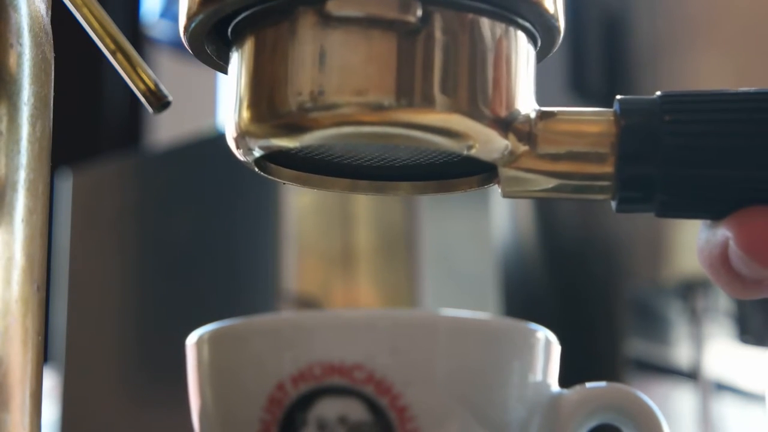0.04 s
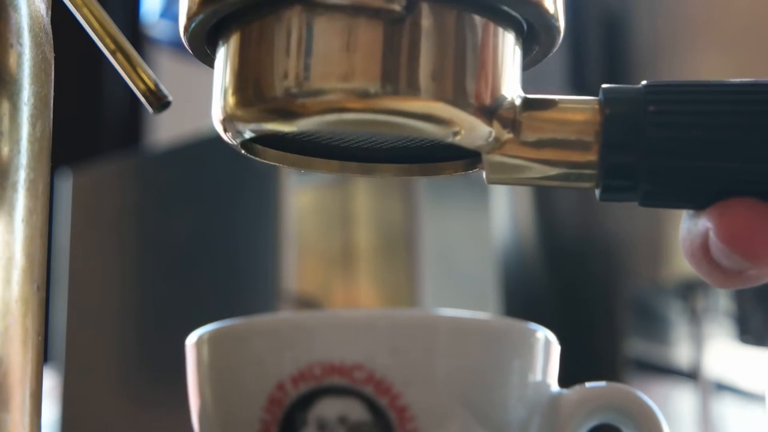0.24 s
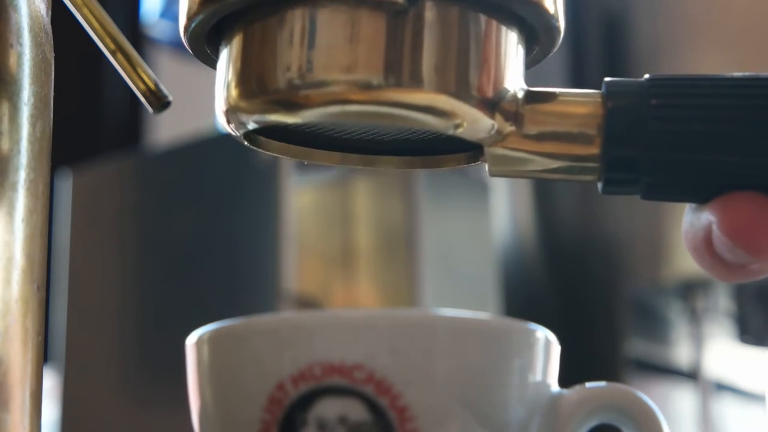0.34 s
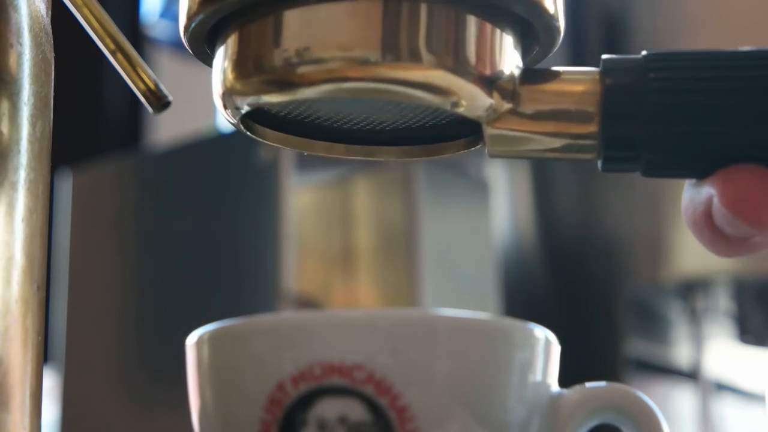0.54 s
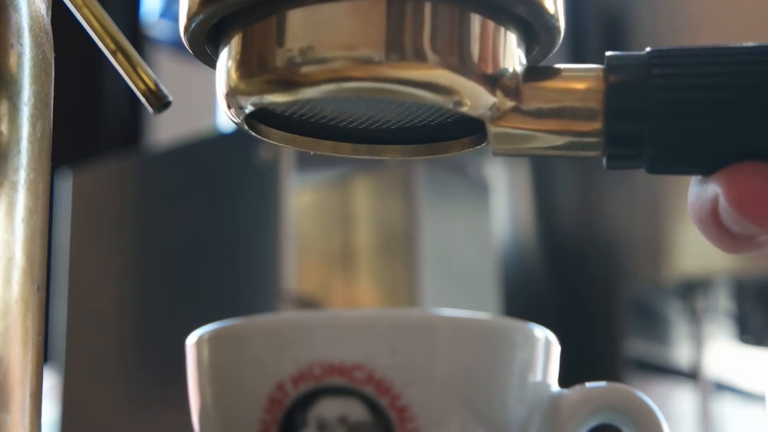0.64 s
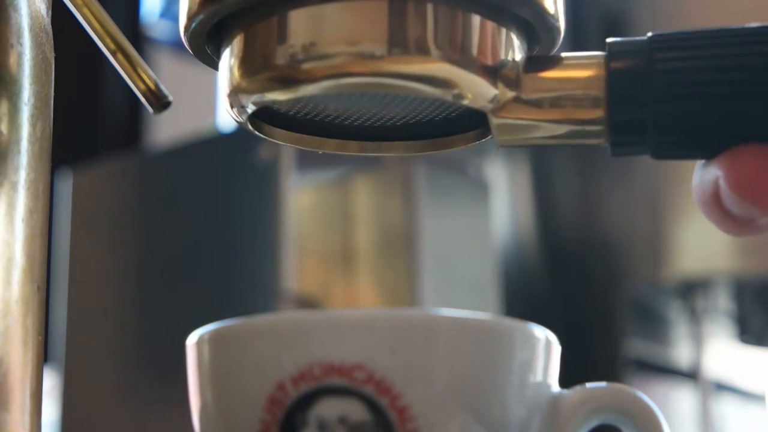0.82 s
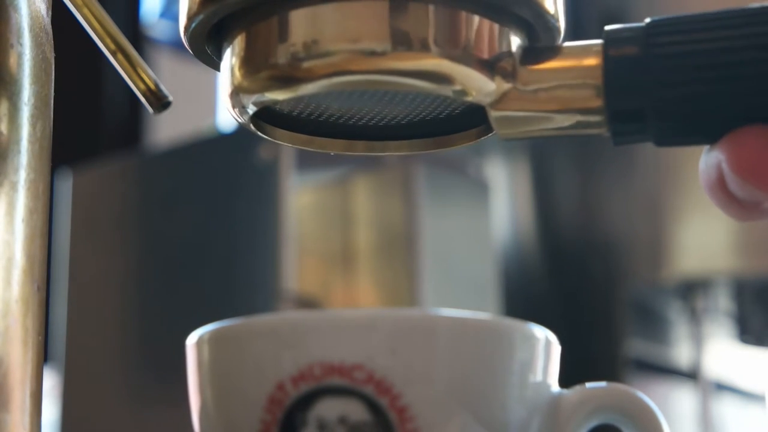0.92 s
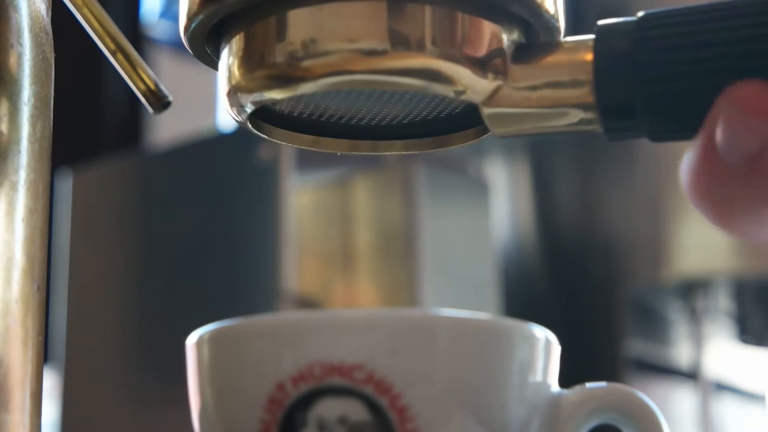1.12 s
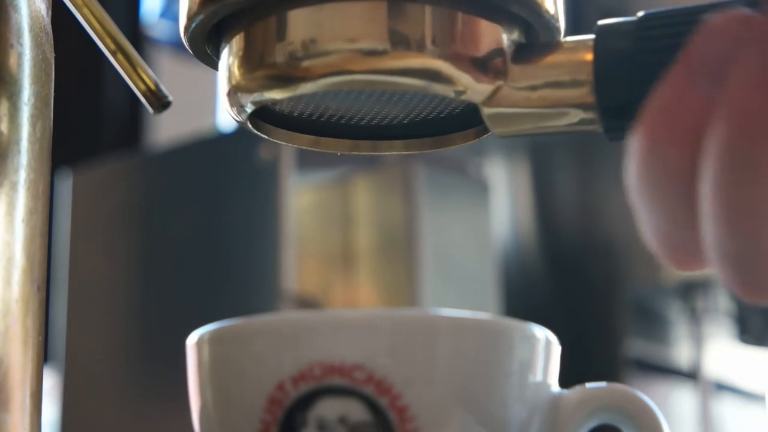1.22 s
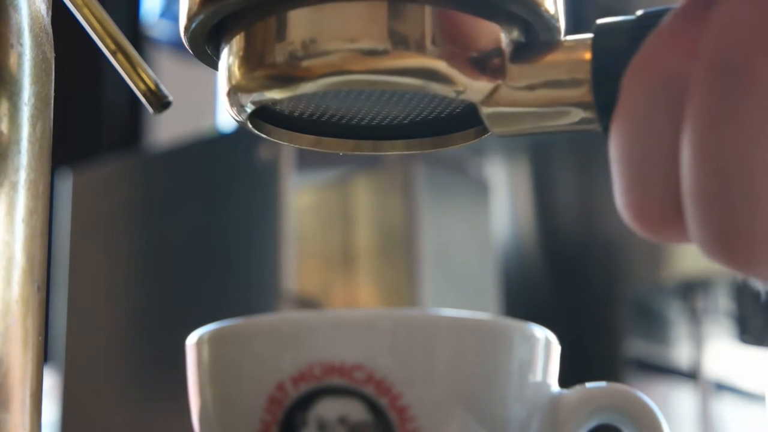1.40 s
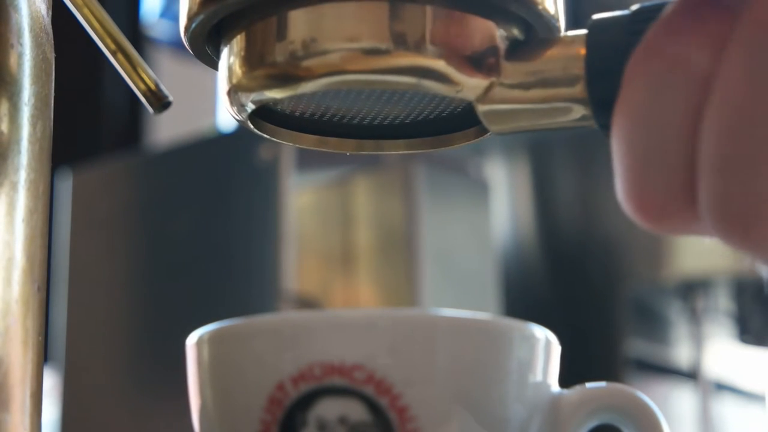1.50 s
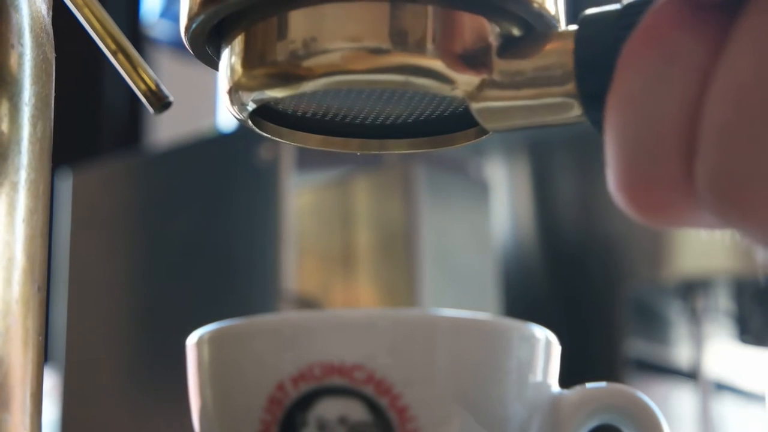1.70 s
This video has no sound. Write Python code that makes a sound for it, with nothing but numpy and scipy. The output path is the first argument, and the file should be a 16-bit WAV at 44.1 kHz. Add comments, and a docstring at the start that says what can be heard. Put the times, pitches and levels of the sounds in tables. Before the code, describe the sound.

Metal clicks and knocks as a filter holder locks into a coffee machine.

```python
"""A low hum and room noise lie under a quiet room. Close by, from 0.2 s, a brass filter holder is pushed
up into the head of a coffee machine and twisted tight: its lugs click, scrape and chatter on the steel
collar, the holder rings, the casing rattles and the heavy head answers with dull knocks.
From 0.7 s the hand turns the handle with faint rubbing and a few soft knocks; a last click at 1.67 s."""
import sys
import numpy as np
from scipy import signal
from scipy.fft import rfft, irfft
from scipy.io import wavfile
from scipy.ndimage import uniform_filter1d

SR = 44100
rng = np.random.default_rng(int(sys.argv[2]) if len(sys.argv) > 2 else 0)


def wav_out(sig):
    """Save sig, one row per channel (or a flat mono array), as 16-bit PCM at SR to the path in sys.argv[1]."""
    wavfile.write(sys.argv[1], SR, np.round(np.clip(np.atleast_2d(sig).T, -1, 1) * 32767).astype(np.int16))


N = 77175

# room noise: (frequency [Hz], relative density [dB])
AIR_COLOUR = [(30, -21), (110, -11.5), (230, -6), (320, -11.5), (520, -11.5), (850, -19.5), (2000, -24.5),
              (4000, -30), (8000, -34), (12500, -29), (16000, -35)]
# (frequency [Hz], left-right [dB])
AIR_BALANCE = [(200, 7.5), (1000, 8.5), (12000, 1.5)]
# all noise: (frequency [Hz], left-right correlation [0-1])
COHERENCE = [(30, 0.65), (100, 0.62), (700, 0.91), (1500, 0.8), (3000, 0.63), (6000, 0.17), (14000, 0.031)]
# (frequency [Hz], level [dB])
HUM_TONES = [(195.5, -59.5), (586.8, -71)]
# nearby surfaces: (delay [s], gain [dB])
ECHOES = [(0.0114, -12), (0.0146, -15.5)]
# (frequency [Hz], T60 [s])
ROOM_T60 = [(100, 1.1), (260, 0.5), (700, 0.87), (1840, 0.87), (4850, 0.21), (12800, 0.52)]
# (frequency [Hz], gain [dB])
ROOM_GAIN = [(100, -1), (300, 1), (1000, -14), (1840, -8.5), (4850, -5), (12800, -12.5)]
# lug friction: (centre time [s], sigma [s], level [dB], centre [Hz], half width [oct])
RUBS = [(0.2468, 0.0017, -29, 2920, 0.25), (0.47, 0.0056, -47, 2420, 0.53), (0.743, 0.088, -59, 1370, 1.54),
        (1.093, 0.026, -60, 413, 0.42), (1.205, 0.073, -63, 12600, 0.27), (1.21, 0.1, -63, 4570, 2.7),
        (1.71, 0.087, -64.5, 2020, 0.13), (1.692, 0.11, -67, 3230, 0.75)]
# blows on the head, and a knock's echo off a nearby surface (0.368 s): (time [s], level [dB], pitch [Hz], swell
# [s])
KNOCKS = [(0.2019, -32.5, 190, 0.0029), (0.2385, -22, 967, 0.0016), (0.2412, -11.5, 1019, 0.0015),
          (0.2420, -25.5, 780, 0.004), (0.241, -38.5, 145, 0.004), (0.3578, -13.5, 700, 0.0018),
          (0.3583, -21.5, 1260, 0.0008), (0.3680, -21, 727, 0.0026), (0.37, -34, 174.5, 0.0073),
          (0.372, -45, 100.7, 0.016), (0.444, -32.5, 234, 0.0031), (0.4655, -22.5, 636, 0.0014),
          (0.4757, -25, 1126, 0.0041), (0.4778, -21, 639, 0.002), (0.476, -37, 101.7, 0.016),
          (0.516, -38, 800, 0.0022), (0.532, -31, 284, 0.003), (0.6477, -28.5, 1150, 0.0012),
          (0.6570, -29, 249, 0.0041), (0.6590, -29, 490, 0.0021), (0.921, -47, 105, 0.0064),
          (1.4195, -48, 614, 0.0018), (1.6400, -41.5, 155, 0.0022)]
# casing rattle: (frequency [Hz], gain [dB])
CASING_COLOUR = [(50, -17), (110, -4), (250, 1), (430, -9.5), (700, 0.5), (1200, -1), (1700, -4),
                 (1930, -11), (2300, -8), (4200, -11.5), (8000, -25.5), (16000, -17.5)]
# (frequency [Hz], gain [dB], T60 [s])
HOLDER_MODES = [(780, -6.5, 0.24), (940, 2.5, .11), (1098, -4.5, 0.31), (1497, -5.5, 0.28), (1683, 4, 0.08),
                (2230, -3, 0.065), (2479.5, 4, 0.12), (2493, 8, 0.053), (2588, -3.5, 0.12),
                (2933, -10, 0.088), (3210, -25, .08), (4145, -8.5, 0.12), (7230, -31, 0.1),
                (7550, -29, 0.065)]
# (frequency [Hz], gain [dB])
CLICK_COLOUR = [(300, -30.5), (1500, -3), (5000, 0), (6500, 6), (7400, 7), (8200, -0.5), (9800, -2),
                (10800, 7.5), (12900, 0), (14500, -9.5), (16000, -17)]
# (frequency [Hz], left-right [dB])
CLICK_BALANCE = [(4500, 0), (6500, 2), (9500, 2), (14000, -1.5)]
# lug on collar: (time [s], click [dB], ring [dB], casing [dB], tilt above 2 kHz [dB/oct],
# chatter decay [s], left-right [dB], ping [dB], favoured ring [Hz])
CONTACTS = [(0.2008, -3.5, -32.5, -31.5, 4.5, 0.0017, -3.5, 1.5, 2750),
            (0.2324, -26, -54, -37, -3, 0.0022, -7, 8, 1020),
            (0.2423, -8, -34, -37, 1.5, 0.0018, -1, 4.5, 1060),
            (0.2487, -24, -46, -31, -12, 0.0015, 19.5, 25, 3100),
            (0.3585, -17, -41.5, -35.5, 0.5, 0.001, 0.5, -14.5, 1390),
            (0.4766, -10, -35.5, -36.5, 3, 0.00023, -1, -2.5, 1140),
            (0.4783, -7, -71, -36.5, 2.5, 0.0023, -1, -23, 1140),
            (0.4825, -11.5, -40, -34.5, 3.5, 0.002, -2.5, 0, 4140),
            (0.4844, -7, -40, -34.5, -6.5, 0.0056, 1.5, 0, 2650),
            (0.534, -31, -41, -38.5, -2, .005, 0, -4, 2510),
            (0.6473, -46, -39.5, -42.5, -19, 0.001, -3, -2, 1740),
            (1.6730, -37, -72, -58, -9, 0.0014, 3, 15, 2150)]

AIR_DB, HUM_WANDER_HZ, HUM_PAN_DB = -55, 1.57, 1
ROOM_BUILD_S, ECHO_LOWPASS_HZ, SCATTER_DB, SCATTER_S = 0.0024, 610, -22, 0.0011
RUB_GRAIN_DB = 1.5
KNOCK_DAMPING, KNOCK_HIGHPASS_RATIO = 1.83, 0.75
CASING_T60_S, CASING_BASS_HZ, CASING_BASS_RISE_S = 0.12, 336, 0.0054
FAVOUR_DB, FAVOUR_WIDTH_OCT, PHASE_SCATTER_HZ_PER_RAD = 4.5, 0.24, 10000
CHATTER_DB, PING_HZ, PING_WIDTH_HZ = -0.5, 10700, 1100
SHIMMER_DB, SHIMMER_T60_S = -6.5, 0.086
SHIMMER_DB_PER_DOUBLING, CHATTER_REF_S = -5.5, 0.001  # longer chatter, weaker shimmer


def amp(db):
    return 10 ** (np.asarray(db) / 20)


def unit_rms(x):
    return x / np.sqrt(np.mean(x ** 2) + 1e-20)


def log_interp(table, hz):
    table_hz, value = np.transpose(table)
    return np.interp(np.log(hz + 1), np.log(table_hz + 1), value)


def pan(db):
    return amp(np.array([db / 2, -db / 2])).reshape(2, -1)


def add(mix, start_s, sound):
    part = mix[:, round(start_s * SR):][:, :sound.shape[-1]]
    part += sound[..., :part.shape[1]]


def decay(t, t60_s):
    return np.exp(-np.log(1000) * t / t60_s)


def bins_hz(size):
    return np.fft.rfftfreq(size, 1 / SR)


def noise(size, colour_db=0):
    """Stereo coloured noise, rms 1, nearly uncorrelated in the treble."""
    left, other = rfft(rng.standard_normal((2, size)))
    coherence = np.clip(log_interp(COHERENCE, bins_hz(size)), 0, 1)
    right = coherence * left + np.sqrt(1 - coherence ** 2) * other
    return unit_rms(irfft(np.array([left, right]) * amp(colour_db), size))


def snap(colour_db):
    """Minimum-phase pulse, energy 1."""
    log_gain = np.log(amp(np.r_[colour_db, colour_db[-2:0:-1]]))
    pulse = np.fft.ifft(np.exp(np.conj(signal.hilbert(log_gain)))).real
    return pulse / np.linalg.norm(pulse)


def background():
    """Room noise and a slightly wavering hum."""
    hz = bins_hz(N)
    side_db = log_interp(AIR_BALANCE, hz) / 2
    air = amp(AIR_DB) * noise(N, log_interp(AIR_COLOUR, hz) + np.array([side_db, -side_db]))
    hum = 0
    for tone_hz, db in HUM_TONES:
        wander_hz = HUM_WANDER_HZ * unit_rms(uniform_filter1d(rng.standard_normal(N), size=4000))
        hum += amp(db) * np.sqrt(2) * np.sin(2 * np.pi * np.cumsum(tone_hz + wander_hz) / SR)
    return air + hum * pan(HUM_PAN_DB)


def room(x):
    """Short diffuse tail, dull close reflections, treble scattered by the machine's fittings."""
    hz, t, spectra = signal.stft(noise(SR * 3 // 4), SR, nperseg=256)
    t60_s = log_interp(ROOM_T60, hz)[:, None]
    gain = amp(log_interp(ROOM_GAIN, hz))[:, None] * np.sqrt(2 * np.log(1000) / (t60_s * SR))
    response = signal.istft(spectra * decay(t, t60_s) * gain, SR, nperseg=256)[1]
    t = np.arange(response.shape[1]) / SR
    response *= 1 - np.exp(-t / ROOM_BUILD_S)
    pole = np.exp(-2 * np.pi * ECHO_LOWPASS_HZ / SR)
    dull_pulse = signal.lfilter([1 - pole], [1, -pole], t == 0)
    for delay_s, db in ECHOES:
        add(response, delay_s, amp(db) * dull_pulse)
        scatter = noise(len(t)) * np.exp(-t / SCATTER_S)
        add(response, delay_s, amp(SCATTER_DB) * scatter / np.linalg.norm(scatter[0]))
    return signal.fftconvolve(x, response, axes=1)[:, :N]


def lug_rubs():
    """Grainy friction: the lugs scrape into the collar, then rub as the handle turns."""
    t, octave = np.arange(N) / SR, np.log2(bins_hz(N) + 1)
    out = np.zeros((2, N))
    for centre_s, sigma_s, db, hz, width_oct in RUBS:
        grain_db = RUB_GRAIN_DB * unit_rms(uniform_filter1d(rng.standard_normal(N), size=60))
        colour_db = -20 * np.log10(1 + ((octave - np.log2(hz)) / width_oct) ** 2)
        swell = np.exp(-((t - centre_s) / sigma_s) ** 2 / 2)
        out += amp(db) * swell * unit_rms(amp(grain_db)) * noise(N, colour_db)
    return out


def head_knocks():
    """Heavily damped swings of the head, which radiates little below each blow's pitch."""
    out, t = np.zeros((2, N)), np.arange(SR // 5) / SR
    for start_s, db, hz, swell_s in KNOCKS:
        envelope = (t / swell_s * np.exp(1 - t / swell_s)) ** KNOCK_DAMPING
        swing = amp(db) * envelope * np.sin(2 * np.pi * hz * t)
        highpass = signal.butter(2, KNOCK_HIGHPASS_RATIO * hz, "high", fs=SR)
        add(out, start_s, signal.lfilter(*highpass, swing))
    return out


def casing_rattle(t):
    """Decaying noise; the bass lags as the large panels get moving."""
    hz = bins_hz(len(t))
    rattle = noise(len(t), log_interp(CASING_COLOUR, hz))
    bass = irfft(rfft(rattle) / (1 + (hz / CASING_BASS_HZ) ** 2), len(t))
    return (rattle - bass * np.exp(-t / CASING_BASS_RISE_S)) * decay(t, CASING_T60_S)


def holder_ring(t, favoured_hz):
    """Decaying brass modes; the contact point brings out those near one pitch."""
    ring = 0
    for k, (hz, db, t60_s) in enumerate(HOLDER_MODES):
        favour_db = FAVOUR_DB * np.exp(-(np.log2(hz / favoured_hz) / FAVOUR_WIDTH_OCT) ** 2)
        ear_phase = rng.standard_normal((2, 1)) * hz / PHASE_SCATTER_HZ_PER_RAD
        ring += (-1) ** k * amp(db + favour_db) * decay(t, t60_s) * np.sin(2 * np.pi * hz * t + ear_phase)
    return ring / 2


def lug_click(t, tilt_db_per_oct, chatter_s, ping_db):
    """Impact, chatter and a bright shimmer; the high ping depends on where the lug is hit."""
    chatter = noise(len(t)) * np.exp(-t / chatter_s)
    shimmer = noise(len(t)) * decay(t, SHIMMER_T60_S)
    shimmer_db = SHIMMER_DB + SHIMMER_DB_PER_DOUBLING * np.log2(chatter_s / CHATTER_REF_S)
    force = t == 0
    for db, burst in [(CHATTER_DB, chatter), (shimmer_db, shimmer)]:
        force = force + amp(db) * burst / np.linalg.norm(burst, axis=1, keepdims=True)
    hz = bins_hz(size=1024)
    colour_db = log_interp(CLICK_COLOUR, hz) + tilt_db_per_oct * np.log2(np.maximum(hz, 2000) / 2000)
    colour_db += ping_db * np.exp(-((hz - PING_HZ) / PING_WIDTH_HZ) ** 2)
    side_db = log_interp(CLICK_BALANCE, hz) / 2
    pulses = np.array([snap(colour_db + side_db), snap(colour_db - side_db)])
    return signal.fftconvolve(force, pulses, axes=1)


def lug_contacts():
    """Each contact with the collar clicks, rings the holder and rattles the casing."""
    out, t = np.zeros((2, N)), np.arange(SR // 2) / SR
    for start_s, click_db, ring_db, casing_db, tilt, chatter_s, pan_db, ping_db, favoured_hz in CONTACTS:
        add(out, start_s, amp(click_db) * pan(pan_db) * lug_click(t, tilt, chatter_s, ping_db))
        add(out, start_s, amp(ring_db) * holder_ring(t, favoured_hz))
        add(out, start_s, amp(casing_db) * casing_rattle(t))
    return out


def scene():
    metal = lug_contacts() + head_knocks() + lug_rubs()
    return metal + room(metal) + background()


def record(dry):
    """Low-pass at 16.1 kHz."""
    lowpass = signal.firwin(401, 16100, window=("kaiser", 9), fs=SR)
    return signal.oaconvolve(dry, lowpass[None], "same")


dry = scene()
out = record(dry)
wav_out(out)
```